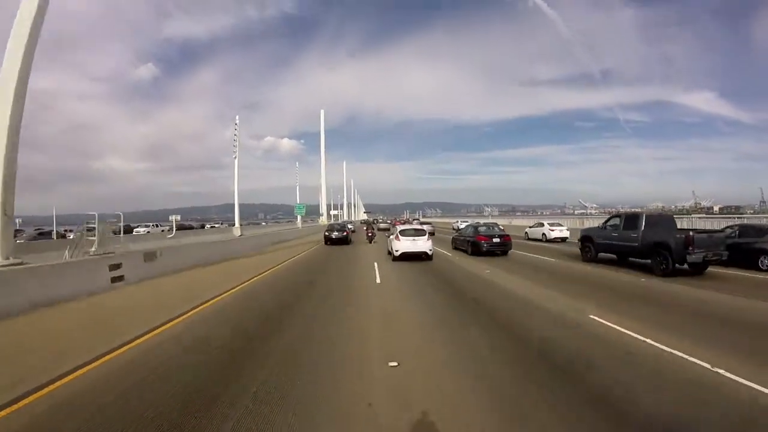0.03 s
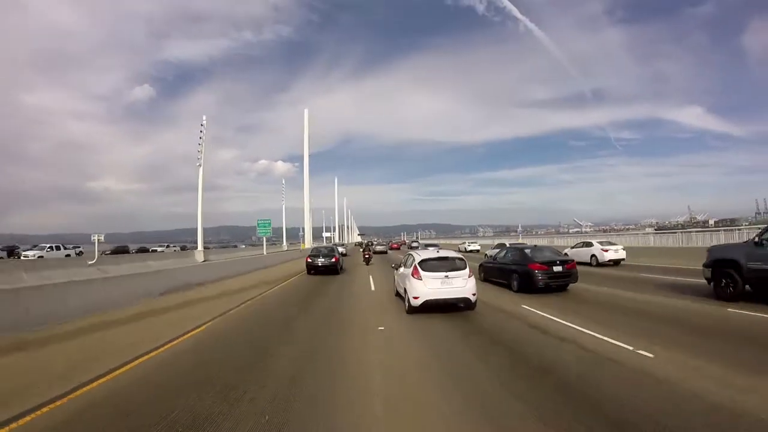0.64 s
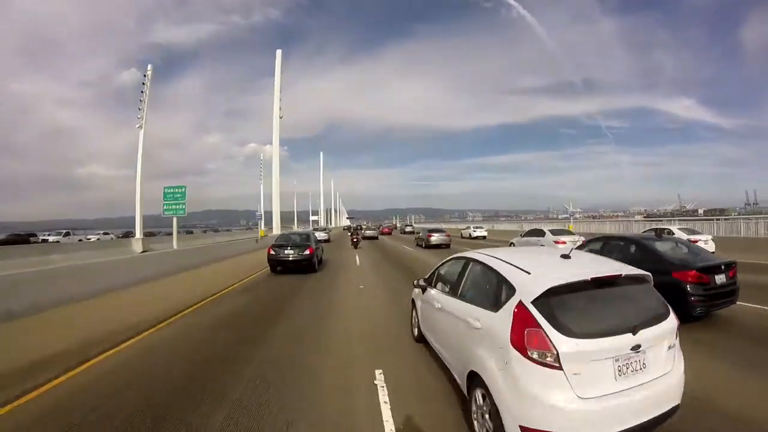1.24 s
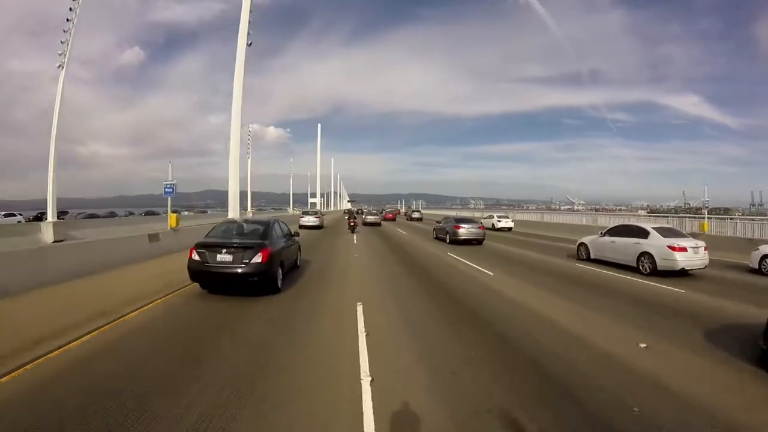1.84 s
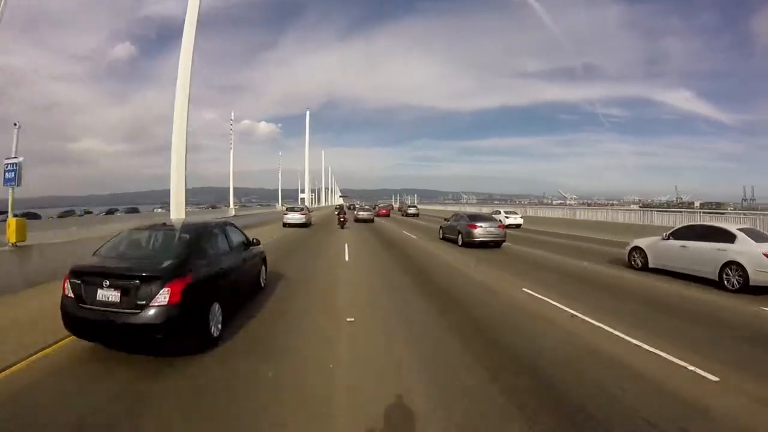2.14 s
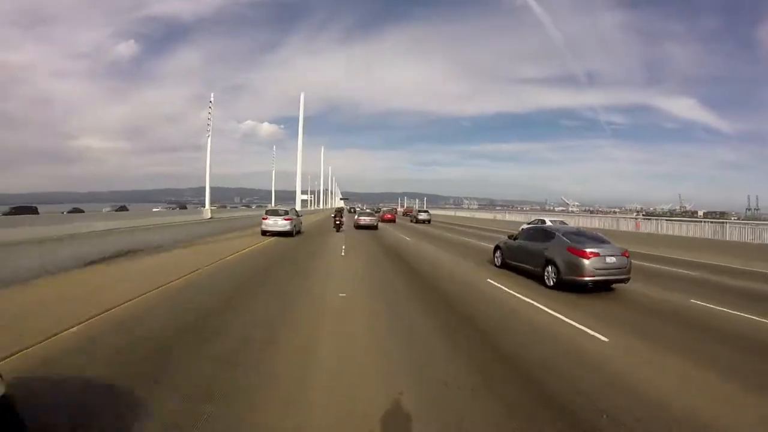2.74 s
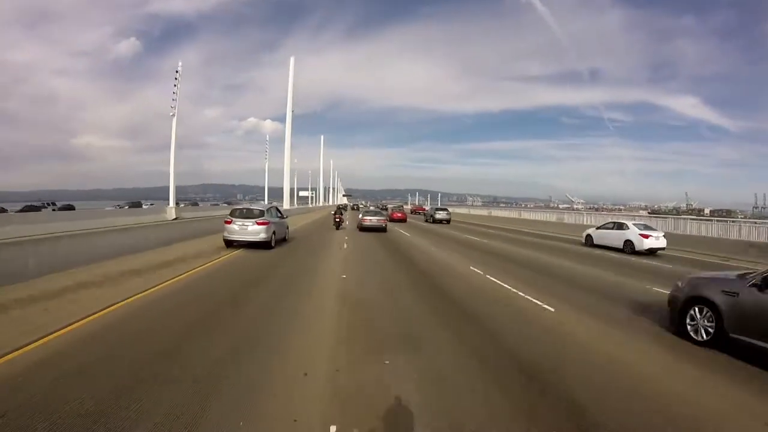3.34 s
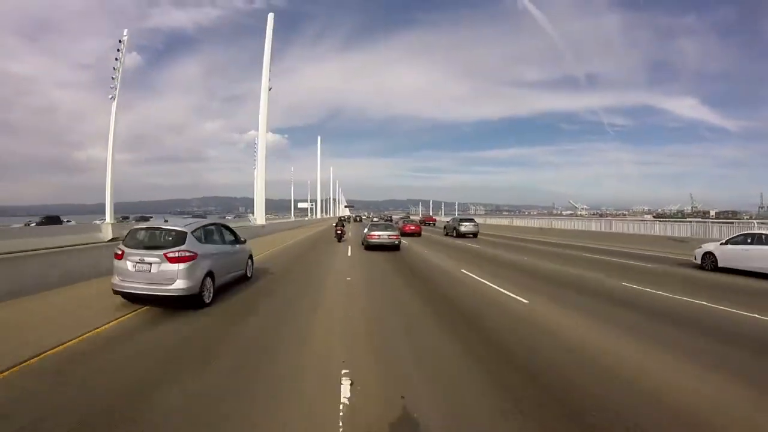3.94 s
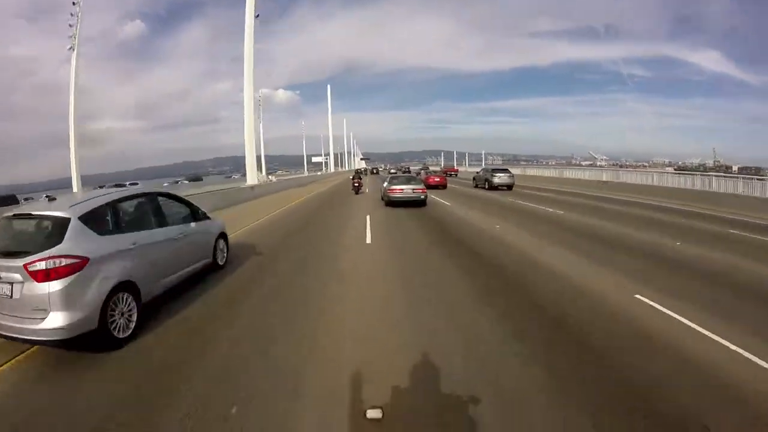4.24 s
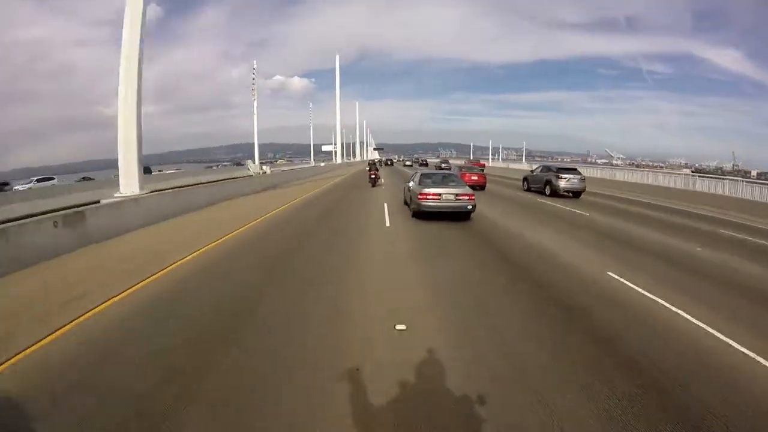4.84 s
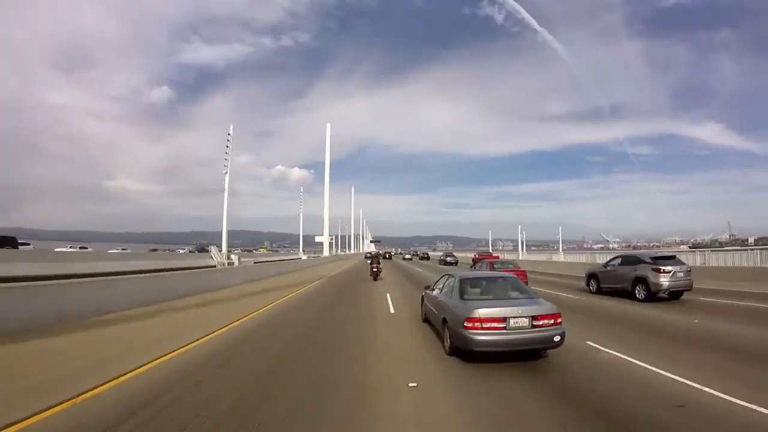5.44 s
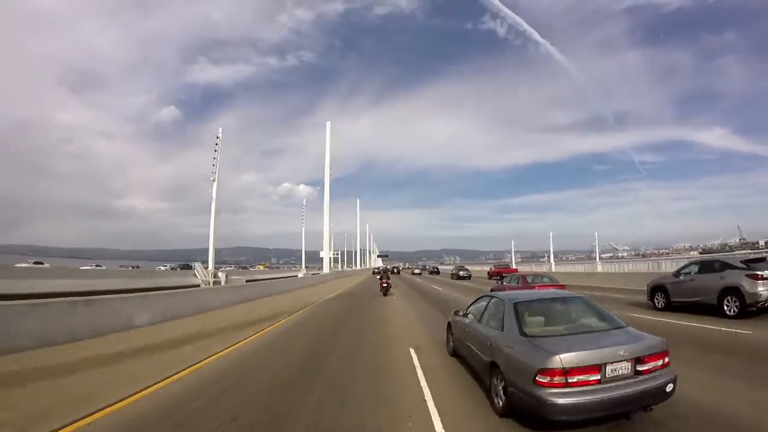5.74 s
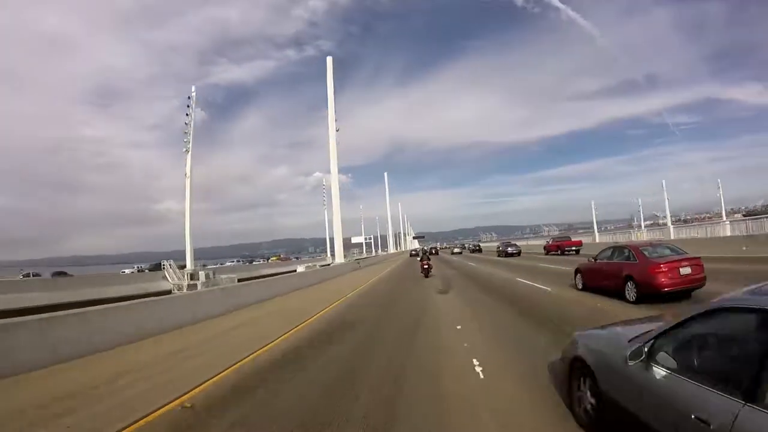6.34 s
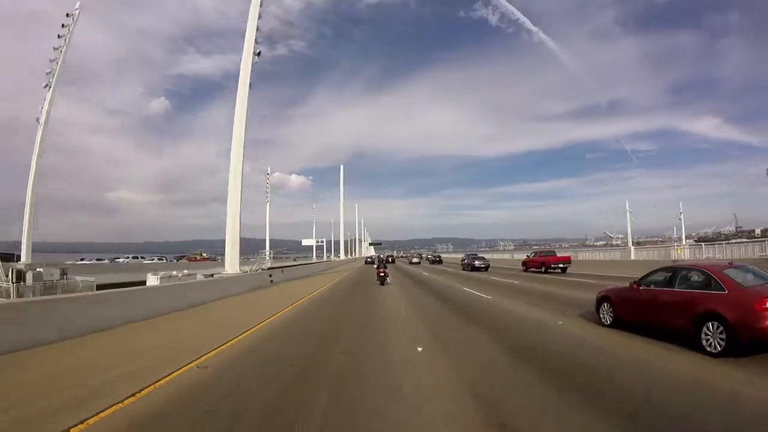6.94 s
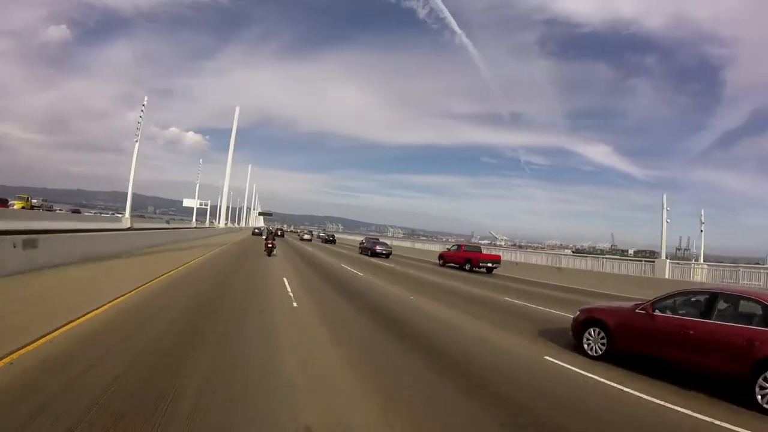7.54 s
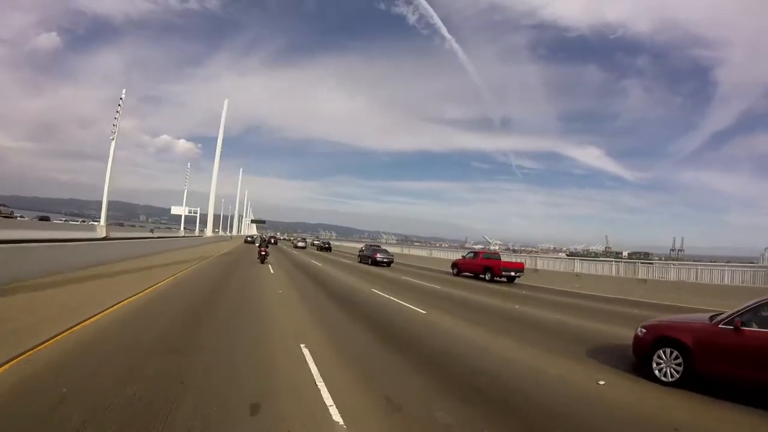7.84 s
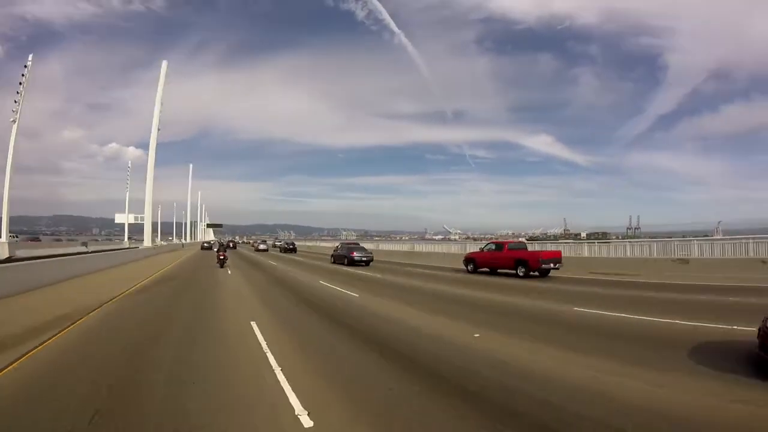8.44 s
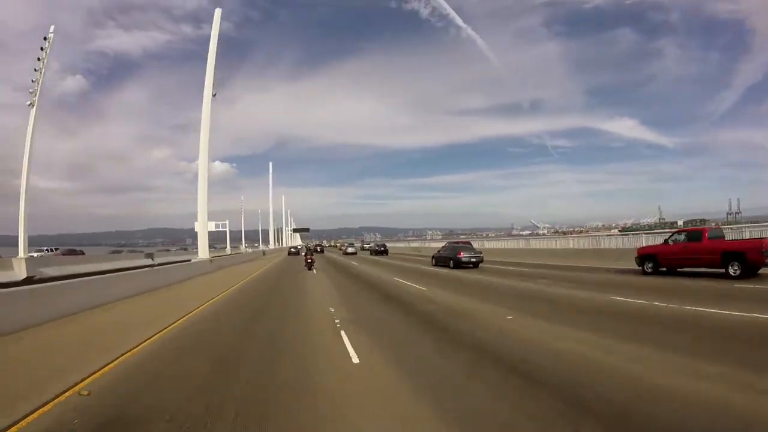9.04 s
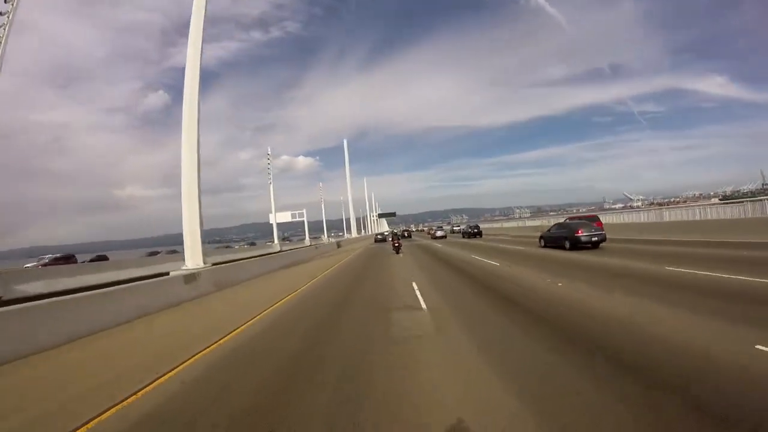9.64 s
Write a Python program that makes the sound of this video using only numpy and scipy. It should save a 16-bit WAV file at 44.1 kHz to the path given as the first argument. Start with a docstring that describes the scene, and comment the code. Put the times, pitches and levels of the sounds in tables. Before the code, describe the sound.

Low, thumping wind buffets a microphone on a motorcycle at highway speed, over a dull roar of tyres on a bridge. Through the first half a high, faltering whistle jumps between pitches above a hissing rush that builds to a strong gust. Hiss and whistle then drop away for about two seconds, leaving a duller, sputtering rush, and come back toward the end.

```python
"""Wind buffets and rushes over a camera on a motorcycle, between lanes of traffic on a bridge.
At highway speed, eddies thump the case and the airstream excites its resonances.
Where the stream strikes a slit in the case it hisses, spits and sheds a wavering edge tone,
a whistle that locks on to one pitch after another. At times the bright hiss and whistle drop away,
leaving a duller rush. Tyres roar on the deck underneath."""
import sys
import numpy as np
from scipy import signal
from scipy.fft import rfft, irfft
from scipy.io import wavfile
from scipy.ndimage import uniform_filter1d

SR = 44100
rng = np.random.default_rng(int(sys.argv[2]) if len(sys.argv) > 2 else 0)


def dump_mix(stems):
    """Bounce the given channels to the path in sys.argv[1] as a 16-bit WAV at rate SR."""
    frames = np.atleast_2d(stems).T  # one column per channel
    limited = np.clip(frames, -1, 1)  # hard clip at full scale
    pcm = np.round(limited * 32767).astype(np.int16)
    wavfile.write(sys.argv[1], SR, pcm)


N = 426888
T = np.arange(N) / SR
HZ = np.fft.rfftfreq(N, 1 / SR)
CRUISE_DB = -38  # the usual airstream, to which the growth laws refer

# Air past the case, before gusts. Each row: time in seconds, level in dB.
AIRSTREAM = [(0, -42.5), (.5, -47), (1.25, -42), (2.12, -41.5), (2.22, -38), (2.5, -40.5), (2.8, -35),
             (3.15, -41), (3.45, -37.5), (4.18, -37), (4.45, -30), (4.95, -30), (5.48, -39), (6.2, -40),
             (6.6, -37), (7.28, -41), (7.85, -36.5), (9.05, -38.5), (9.68, -41.5)]
# Large eddies that strike the case. Each row: centre in seconds, length in seconds, boost in dB.
THUMPS = [(1.08, 0.2, 4.5), (2.754, 0.096, 7), (3.636, 0.089, 5.5), (4.1, .12, 5), (5.385, 0.15, 6.5),
          (7.119, 0.53, 4), (8.832, .12, 5.5), (9.4, 0.24, 5)]
# Broad spectra of the noises. Each row: frequency in Hz, relative spectral density in dB.
BUFFET_SPECTRUM = [(8, -35), (18, -9), (40, -11.5), (75, -5.5), (95, -4.5), (116, 4), (135, -2.5),
                   (160, -16), (190, -20.5), (300, -42), (700, -90)]
RUSH_SPECTRUM = [(300, -24), (900, -21), (1300, -3.5), (1900, 1.5), (2600, -2.5), (3400, -10.5),
                 (4300, -16.5), (4500, -21.5), (6800, -26.5), (8100, -25.5), (9700, -38), (11500, -46),
                 (15000, -56)]
SLIT_SPECTRUM = [(500, -59.5), (1500, -18), (2300, -10.5), (2600, -0.5), (3900, -3.5), (4130, -15.5),
                 (4500, -24.5), (5700, -15.5), (6900, -20.5), (7700, -25), (8900, -36), (11500, -46),
                 (15000, -58)]
SIZZLE_SPECTRUM = [(6000, -25.5), (9700, 0), (11200, -17), (12400, -14), (13200, -17), (15000, -20)]
ROAD_SPECTRUM = [(100, -24), (190, -3.5), (225, -1), (249, 4), (275, -0.5), (370, -2.5), (450, 2),
                 (540, -0.5), (640, -5), (950, -3), (1100, -10.5), (1600, -16.5), (4000, -45)]
# Resonances of the case, the slit and the edge tone's path.
# Each row: centre in Hz, width in Hz, height in dB (negative for a notch).
CASE_MODES = [(950, 104, 11.5), (1422, 117, 7), (1661, 160, -5), (2170, 48, 5.5), (2275, 140, -2),
              (2970, 186, -3.5), (6180, 750, 12)]
SLIT_MODES = [(2467, 270, 5), (3020, 260, -6.5), (3220, 320, 2.5), (5250, 150, -13), (6086, 433, 14.5),
              (6470, 320, 13), (6930, 270, -6), (7220, 170, -13), (10530, 630, 11.5)]
TONE_MODES = [(6122, 410, 13.5), (6485, 326, 14), (8040, 270, 11), (8950, 320, 6)]
# How well the edge tone carries to the listener. Each row: frequency in Hz, relative gain in dB.
TONE_PATH = [(4000, -15), (5500, -12.5), (6900, -21.5), (9000, -19.5), (9900, -20), (11500, -34)]
# The bright hiss and whistle drop away for a while, leaving a duller rush.
# Each row: start in seconds, end in seconds, fade time in seconds, depth in dB.
DULL_SPELLS = [(.3, 0.562, .02, 14), (1.12, 1.158, 0.018, 9), (5.41, 7.302, 0.5, 23), (8.55, 8.67, .07, 12),
               (9.556, 9.698, 0.087, 20)]
# Strong spits in the longest dull spell. Each row: centre in seconds, relative level in dB.
STRONG_SPITS = [(5.615, -31), (6.199, -37), (6.379, -36), (6.562, -31.5), (6.715, -35), (6.999, -35.5)]
# The jet locks on and the slit whistles.
# Each row: start in seconds, end in seconds, target pitch in Hz, relative strength in dB.
JET_LOCKS = [(0, .3, 4930, 2), (.58, 1.0, 4750, -1), (1.03, 1.35, 5500, 2), (1.38, 2.1, 4950, -4.5),
             (2.149, 2.34, 6200, 2.5), (2.55, 3.048, 6200, -3), (3.28, 3.52, 6150, 2.5),
             (3.6, 4.23, 6400, 2), (4.37, 5.02, 8800, -.5), (5.07, 5.19, 8000, 2.5),
             (5.44, 5.545, 6280, 10), (7.4, 7.5, 5890, 3.5), (9.197, 9.27, 6300, 8), (9.37, 9.58, 6000, 5)]
# Tyres on the deck. Each row: time in seconds, relative level in dB.
TYRE_ROAR = [(0, -46.5), (.25, -51), (2.6, -44.3), (5.4, -41), (5.52, -46.5), (7.3, -45), (7.65, -48),
             (8.6, -49), (8.95, -46), (9.68, -46)]
# Cars close by. Each row: centre in seconds, length in seconds, boost of the roar in dB.
CAR_PASSES = [(1.65, 0.45, 3), (2.72, .4, 2), (4.3, 0.4, 2)]
# Brief dips in the fainter sound. Each row: centre in seconds, length in seconds, depth in dB.
DIPS = [(1.385, .02, 7), (2.11, .016, 14), (3.708, 0.044, 24), (3.903, .016, 5), (3.988, 0.016, 10),
        (4.051, 0.019, 13), (4.223, .016, 9), (4.476, 0.014, 14), (4.519, .02, 8), (5.025, 0.013, 12),
        (5.308, 0.015, 13), (7.909, .02, 13), (8.145, .013, 15), (8.596, 0.054, 7)]


def buffet(air_db, level_db=-33.5, growth=0.55, ceiling_db=-32, swell_db=1.05):
    """Turbulent pressure grows with the airstream and drives the case's lowest resonance, a boom."""
    steady_db = np.minimum(level_db + growth * (air_db - CRUISE_DB), ceiling_db)
    thumps_db = sum(db * bump(s, length) for s, length, db in THUMPS)
    boom = unit_rms(filtered(noise(), colour(BUFFET_SPECTRUM)))
    return boom * amp(steady_db + thumps_db + swell_db * eddies(3.6, 11.0))


def rush(air_db, trim_db=1.39):
    """Broadband excitation: air scrubs the whole case and sounds its resonances."""
    return filtered(noise() * amp(air_db + trim_db), colour(RUSH_SPECTRUM, CASE_MODES))


def whistle(jet_db, jet_hz, idle_db=-13.5, ramp_s=.03, trim_db=-12):
    """Resonance: the edge tone swells in a lock and flares where its pitch crosses a mode of the slit."""
    locked = sum(amp(db) * gate(start, end, ramp_s, ramp_s) for start, end, _, db in JET_LOCKS)
    strength = np.maximum(locked, amp(idle_db)) * amp(jet_db + trim_db)
    return filtered(edge_tone(jet_hz) * strength, colour(TONE_PATH, TONE_MODES))


def edge_tone(hz, wander=.024, width_hz=100, skirt_share=0.13, skirt_db=-1.2, stall_db=4.2):
    """Vortex shedding gives a faltering narrow band; its waver and noisy skirt grow with pitch."""
    relative_pitch = hz / hz.mean()
    wavering_hz = hz * (1 + wander * relative_pitch ** 2 * eddies(5, 23.8))
    phase = 2 * np.pi * np.cumsum(wavering_hz) / SR
    core = low_noise(width_hz) * amp(stall_db * np.minimum(eddies(6.9, 36), 1.2))
    skirt = low_noise(skirt_share * hz.max()) * amp(skirt_db) * relative_pitch
    return core * np.cos(phase) + skirt * np.sin(phase)


def jet_pitch(air_db, cruise_hz=6126, octaves_per_db=-0.01, pull_share=.95, glide_s=.07):
    """Lock-in pulls the jet toward a target pitch; left free, it sinks slightly as the stream grows."""
    free_hz = cruise_hz * 2 ** (octaves_per_db * (air_db - CRUISE_DB))
    holds = [gate(start - glide_s / 2, end, glide_s, glide_s) for start, end, _, _ in JET_LOCKS]
    pull_hz = sum(hold * (hz - free_hz) for hold, (_, _, hz, _) in zip(holds, JET_LOCKS))
    return free_hz + pull_share * pull_hz / np.maximum(sum(holds), 1)


def slit_hiss(air_db, dull_db, jet_hz, level_db=-34.5, growth=0.83, flutter_db=1.5,
              dull_flutter_db=4.8, cavity_hz=6300, width_hz=800, detuned_db=-7):
    """Cavity resonance: the hollow behind the slit colours the jet's hiss and spits."""
    hiss_db = level_db + growth * (air_db - CRUISE_DB) - dull_db
    dullness = np.clip(dull_db / 21, 0, 1) ** 2  # in a dull spell the hiss flickers and spits
    swing_db = (flutter_db + dull_flutter_db * dullness) * eddies(7.5, 74)
    jet = noise() * amp(hiss_db + swing_db) + spits(dullness * amp(air_db))
    hiss = filtered(jet, colour(SLIT_SPECTRUM, SLIT_MODES))
    ring = filtered(hiss, np.exp(-((HZ - cavity_hz) / width_hz) ** 4))
    # a jet that swings far faster than the cavity no longer feeds its resonance
    detuned = np.clip((jet_hz - cavity_hz) / width_hz - 1 / 2, 0, 1)
    ring_gain = amp(detuned_db * detuned + flutter_db * eddies(1.6, 50))
    return hiss + ring * (ring_gain - 1)


def spits(weak_gain, length_s=0.021, strong_db=-2.5, weak_db=-5, per_s=9):
    """Intermittency: short bursts of hiss, a few strong ones among weak ones at random times."""
    strong = sum(amp(db + strong_db) * bump(s, length_s) for s, db in STRONG_SPITS)
    arrivals = rng.random(N) < per_s / SR
    weak = signal.oaconvolve(arrivals, np.hanning(round(2 * length_s * SR)), "same")
    return noise() * (strong + weak * weak_gain * amp(weak_db))


def sizzle(air_db, level_db=-57, blast_db=-30, growth=3.0):
    """A steep power law: the finest eddies outgrow the airstream and show only in the strongest blast."""
    return filtered(noise(), colour(SIZZLE_SPECTRUM)) * amp(level_db + growth * (air_db - blast_db))


def road_roar(swell_db=1.0, trim_db=0.9):
    """Rolling noise: tyres on concrete make a dull roar that swells beside each car."""
    passes_db = sum(db * bump(s, length) for s, length, db in CAR_PASSES)
    level_db = curve(TYRE_ROAR) + passes_db + trim_db
    return filtered(noise(), colour(ROAD_SPECTRUM)) * amp(level_db + swell_db * eddies(3.7, 25))


def thinned(x, knee_db=-2, knee_rise=.12, lift=.09):
    """Spectral gating: in each dip only the strongest tones remain, fewer and louder the deeper it is."""
    hz, t, spectra = signal.stft(x, SR, nperseg=768, noverlap=576)
    depth_db = sum(depth * np.exp(-(2 * (t - s) / length) ** 4) for s, length, depth in DIPS)
    midband_rms = np.sqrt(np.mean(abs(spectra[(hz > 1000) & (hz < 4000)]) ** 2, axis=0))
    knee = amp(knee_db + knee_rise * depth_db) * midband_rms + 1e-12
    faint = 1 / (1 + (uniform_filter1d(abs(spectra), size=5, axis=1) / knee) ** 16)
    gain = amp(depth_db * (lift * (1 - faint) - faint))
    return signal.istft(spectra * gain, SR, nperseg=768, noverlap=576)[1][:N]


def eddies(slow_hz, fast_hz):
    """Turbulent fluctuation of rms 1 between two rates; large slow eddies are the strongest."""
    gain = HZ / (HZ ** 2 + slow_hz ** 2) ** (3 / 4) / (1 + (HZ / fast_hz) ** 4)
    return unit_rms(filtered(noise(), gain))


def colour(points, modes=()):
    """A frequency response of mean power 1: a broad slope with resonance peaks and notches."""
    corner_hz, corner_db = np.transpose(points)
    db = np.interp(np.log(HZ + 1), np.log(corner_hz + 1), corner_db)
    for hz, width, height in modes:
        db = db + height / 2 ** ((2 * (HZ - hz) / width) ** 2)
    return unit_rms(amp(db))


def filtered(x, gain):
    """Linear filtering: multiplies the spectrum of x by a gain."""
    return irfft(rfft(x) * gain, N)


def noise():
    """White noise."""
    return rng.standard_normal(N)


def low_noise(width_hz):
    """Low-pass noise of rms 1 with a Gaussian spectrum."""
    return unit_rms(filtered(noise(), np.exp(-(HZ / width_hz) ** 2)))


def gate(start, end, attack_s, release_s):
    """An envelope that rises from 0 to 1 after start, holds, and falls after end."""
    return np.clip(np.minimum((T - start) / attack_s, 1 - (T - end) / release_s), 0, 1)


def bump(centre_s, length_s):
    """A Gaussian swell of height 1."""
    return np.exp(-np.minimum((2 * (T - centre_s) / length_s) ** 2, 100))


def curve(rows):
    """Linear interpolation of a table in time."""
    return np.interp(T, *np.transpose(rows))


def amp(db):
    """Decibels to amplitude ratio."""
    return 10 ** (np.asarray(db) / 20)


def unit_rms(x):
    """Scales to rms 1."""
    return x / np.sqrt(np.mean(x ** 2) + 1e-20)


def scene(gust_db=0.94, buffet_share=0.15, return_s=0.038):
    """Superposition: one gusty airstream drives all the air noise, and the road adds its roar."""
    steady_db = curve(AIRSTREAM)
    air_db = steady_db + gust_db * eddies(0.93, 34)
    # in a dull spell the hiss and whistle drop away and the buffeting eases slightly
    dull_db = sum(db * gate(start, end, fade_s, return_s) for start, end, fade_s, db in DULL_SPELLS)
    jet_hz = jet_pitch(steady_db)
    air = rush(air_db) + slit_hiss(air_db, dull_db, jet_hz)
    air += whistle(air_db - dull_db, jet_hz) + sizzle(air_db)
    air += buffet(air_db - buffet_share * dull_db)
    return thinned(air + road_roar())[None]


def record(dry, cutoff_hz=15150):
    """Band limiting: a steep low-pass filter removes the highest treble."""
    low_pass = signal.firwin(511, cutoff_hz, window=("kaiser", 9), fs=SR)
    return signal.oaconvolve(dry, low_pass[None], "same")


dry = scene()
out = record(dry)
dump_mix(out)
```